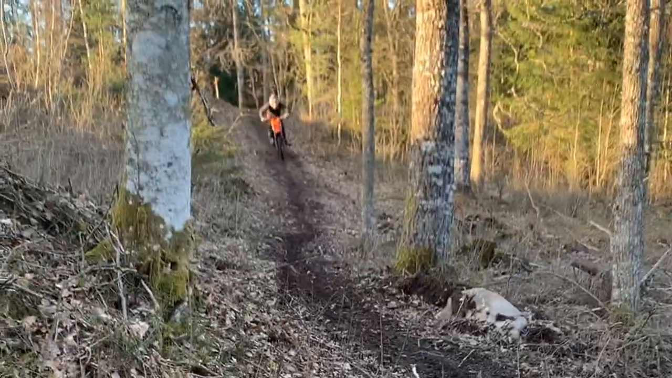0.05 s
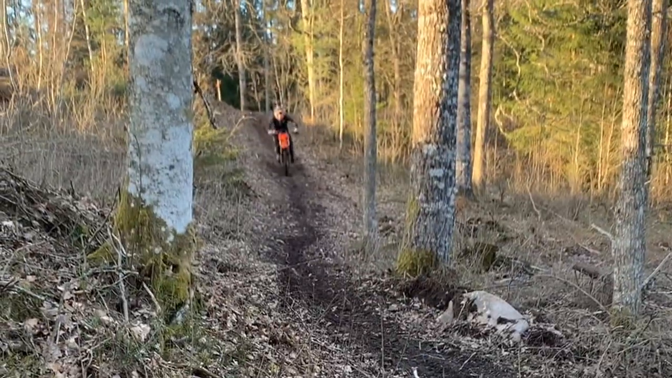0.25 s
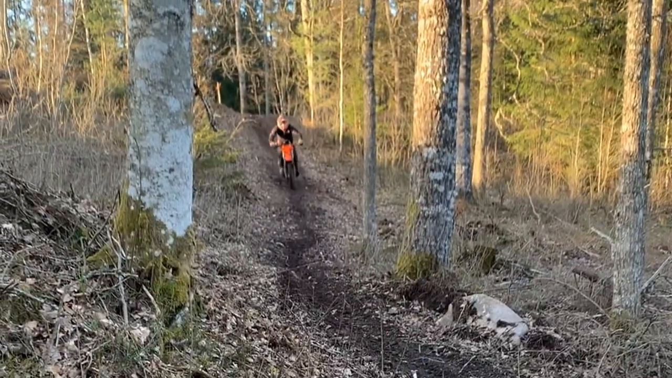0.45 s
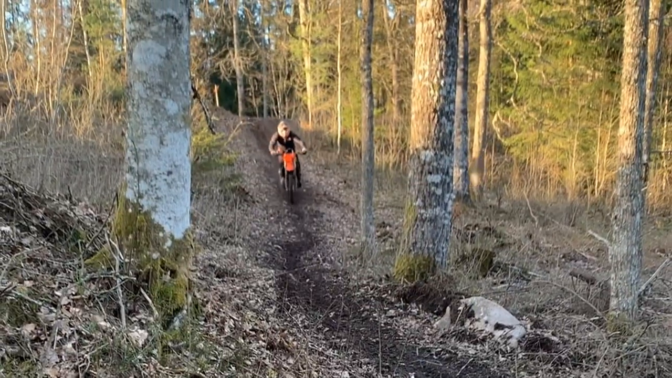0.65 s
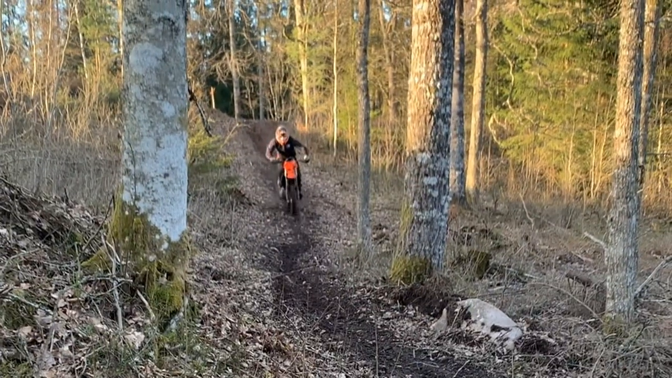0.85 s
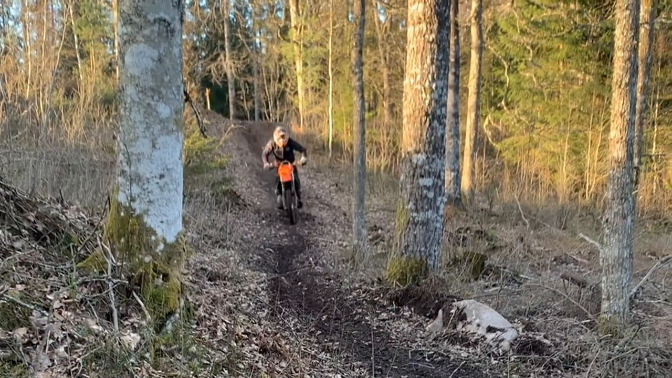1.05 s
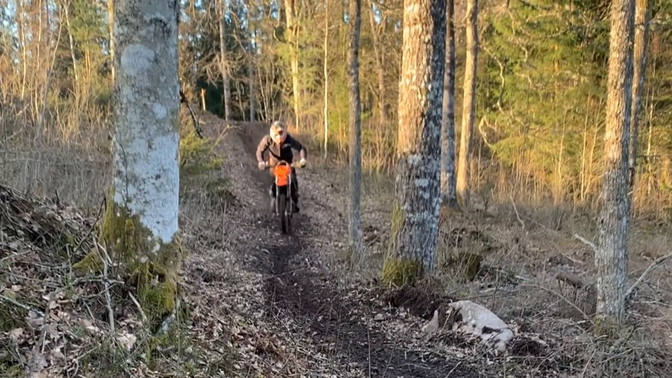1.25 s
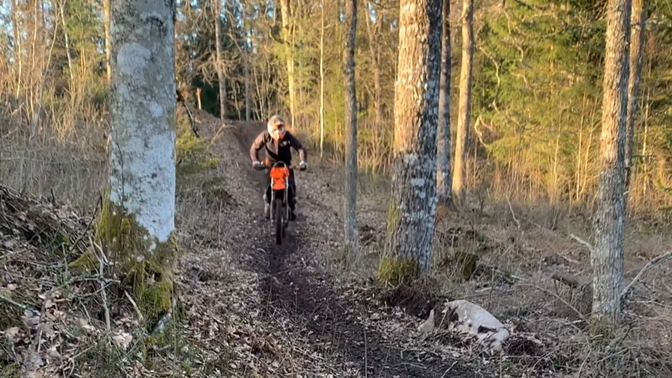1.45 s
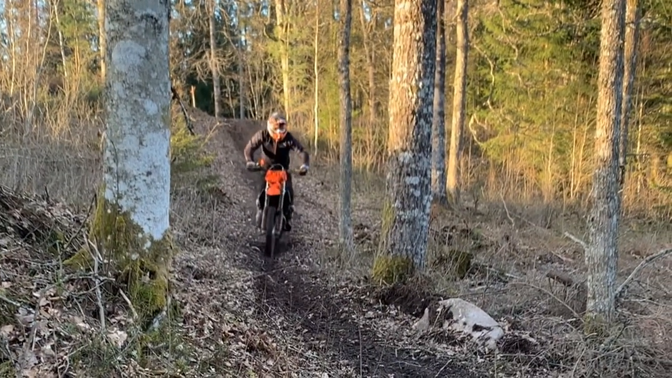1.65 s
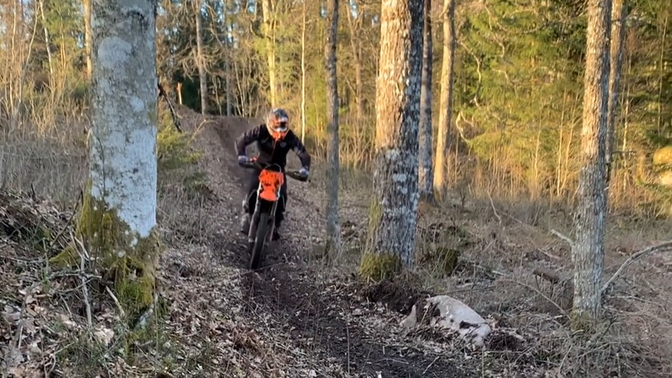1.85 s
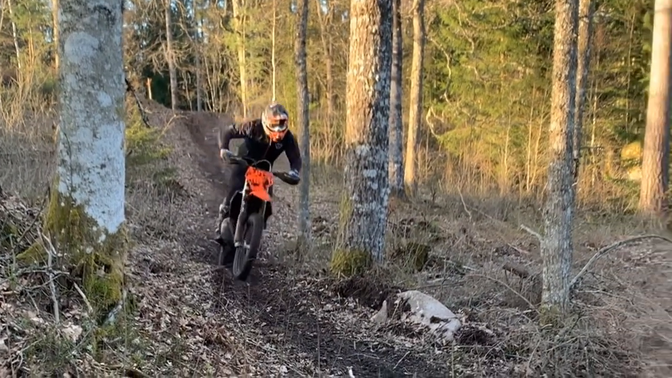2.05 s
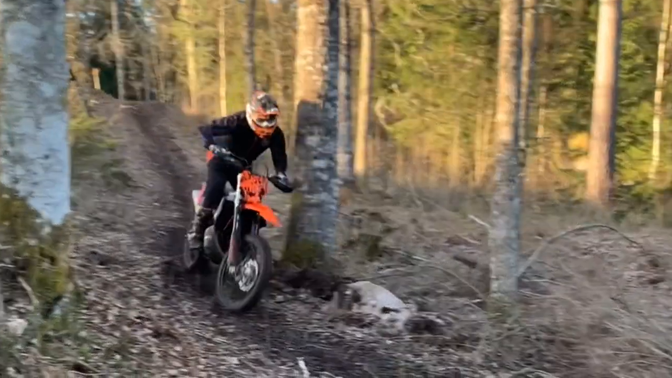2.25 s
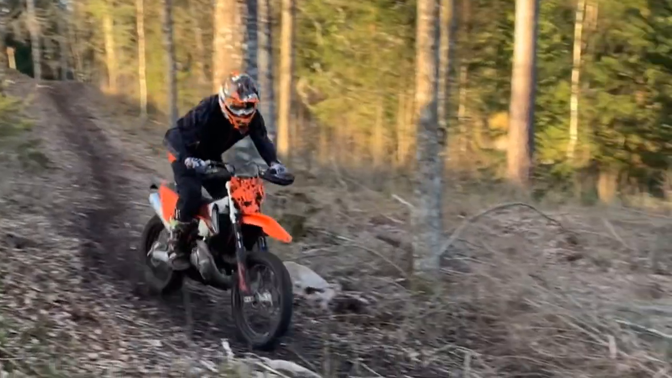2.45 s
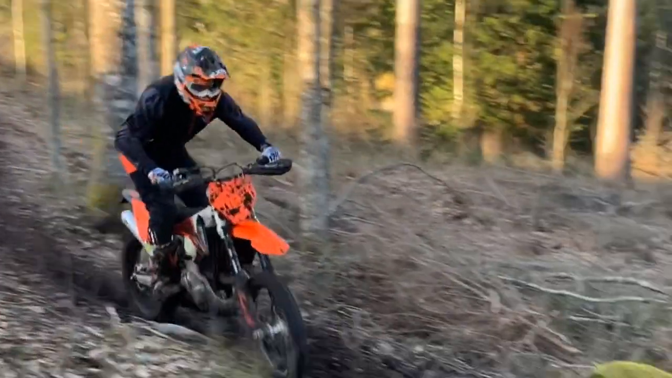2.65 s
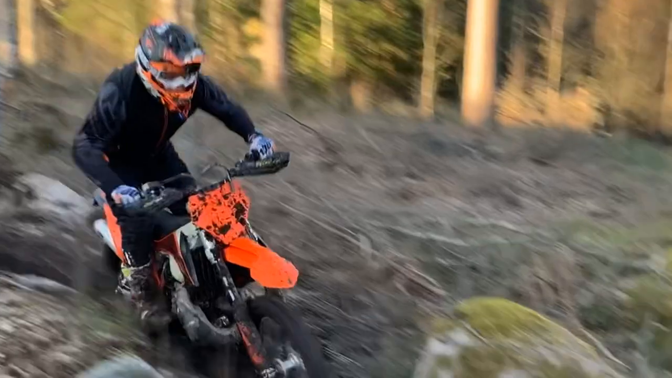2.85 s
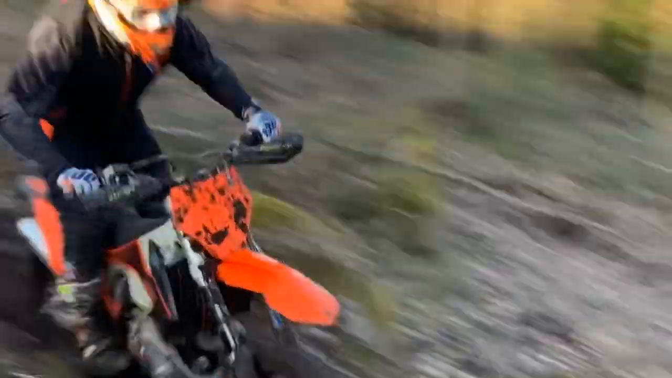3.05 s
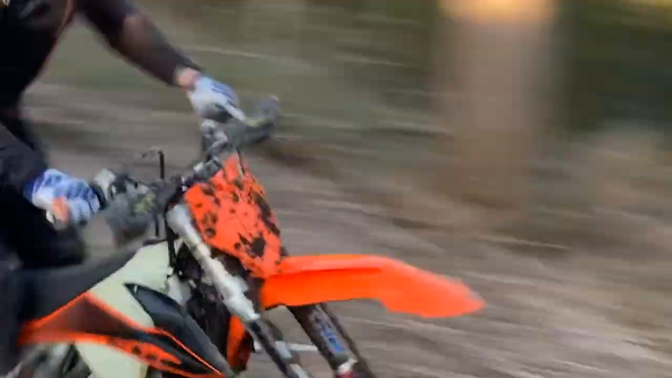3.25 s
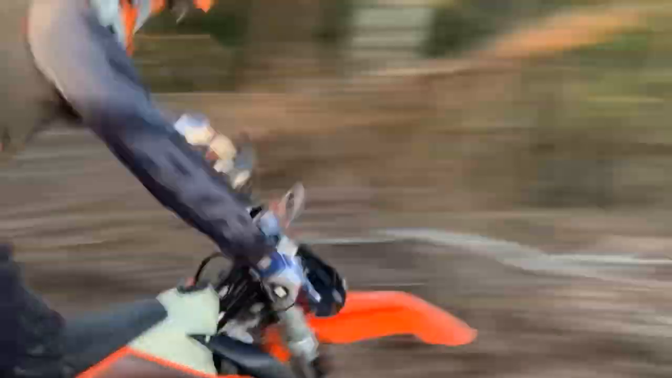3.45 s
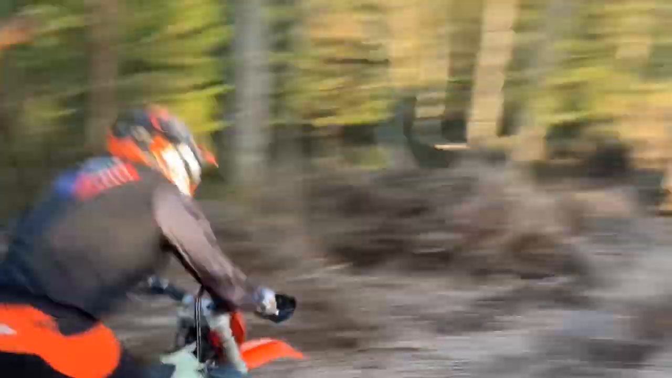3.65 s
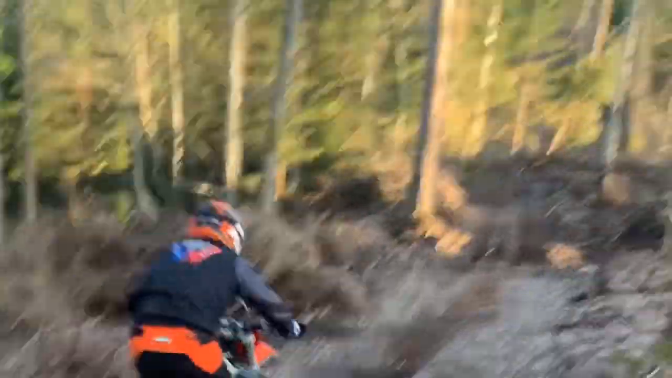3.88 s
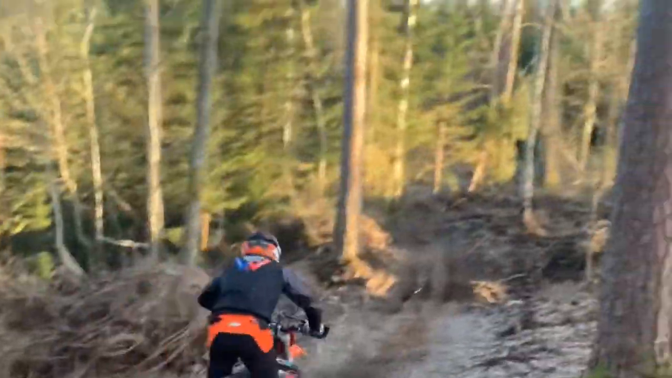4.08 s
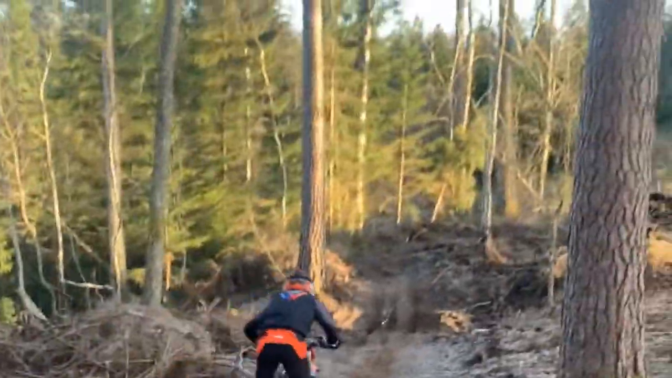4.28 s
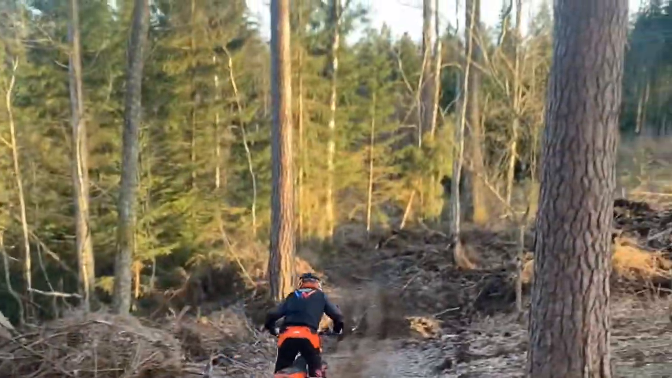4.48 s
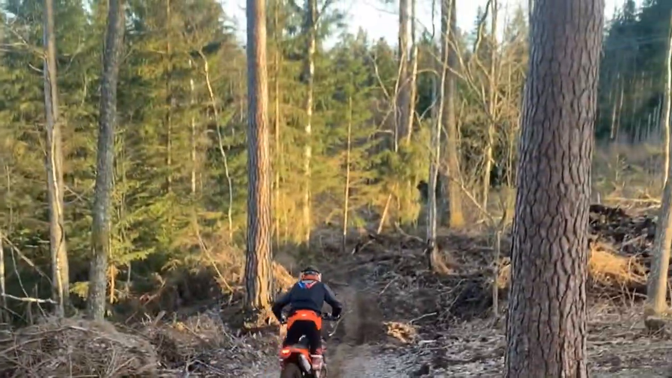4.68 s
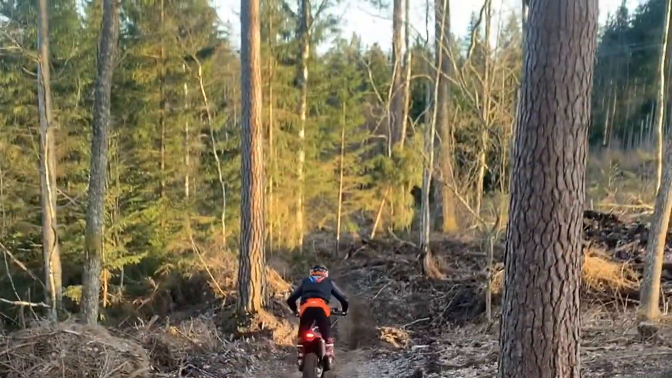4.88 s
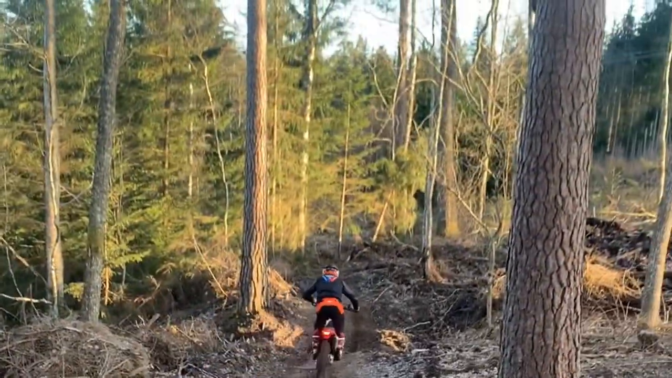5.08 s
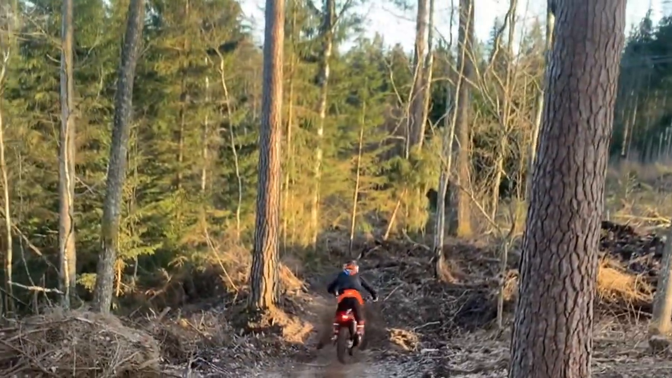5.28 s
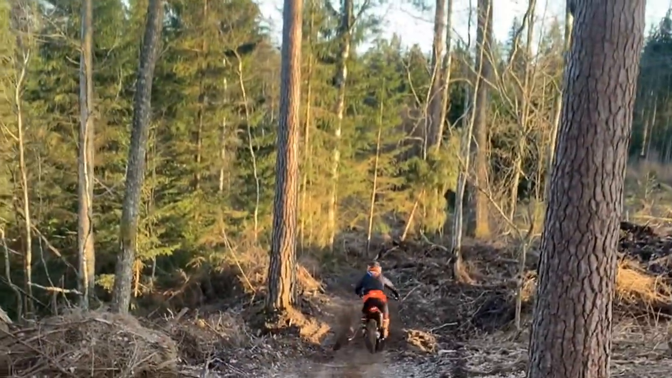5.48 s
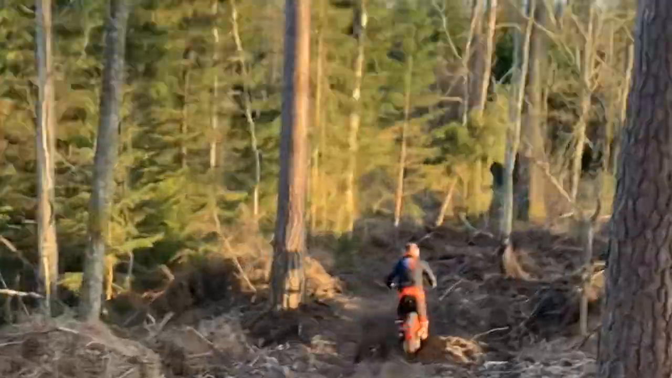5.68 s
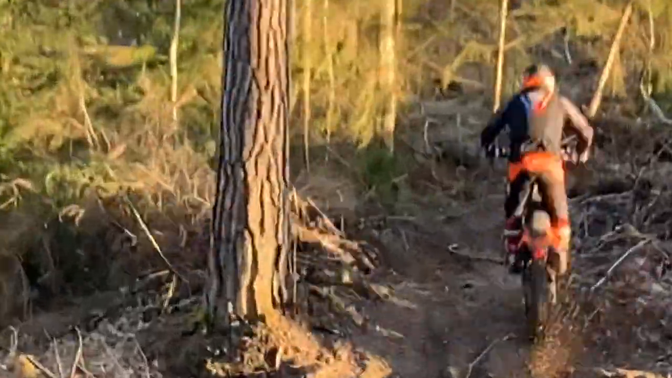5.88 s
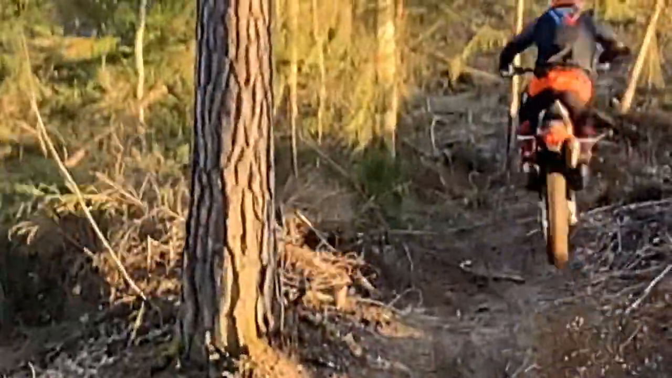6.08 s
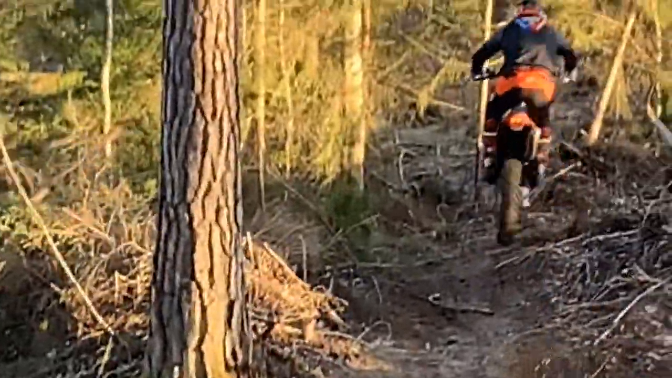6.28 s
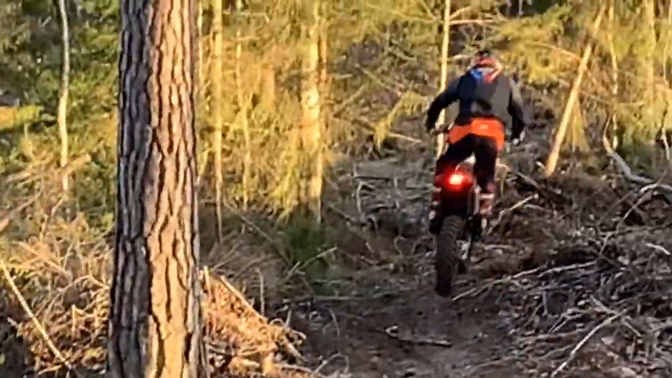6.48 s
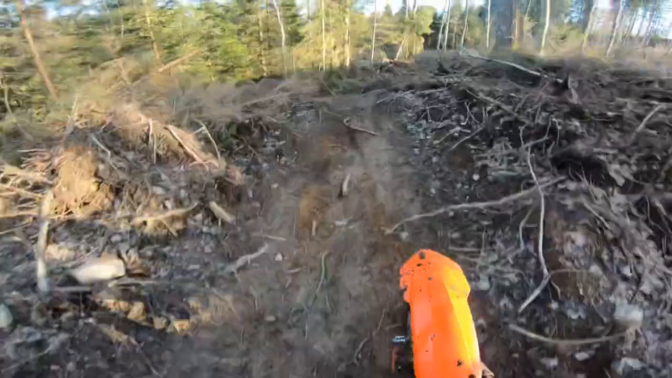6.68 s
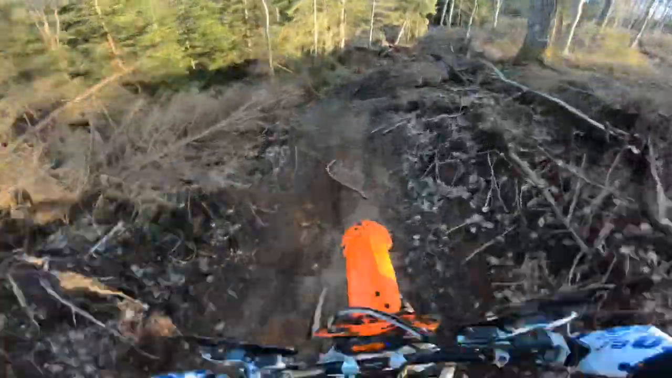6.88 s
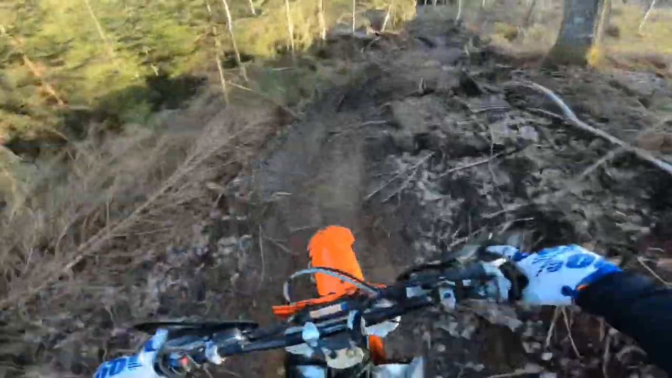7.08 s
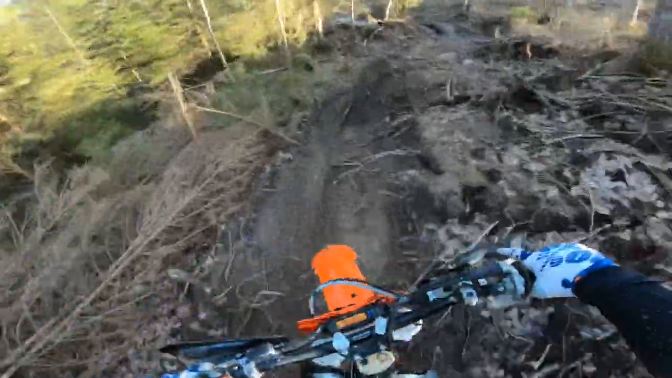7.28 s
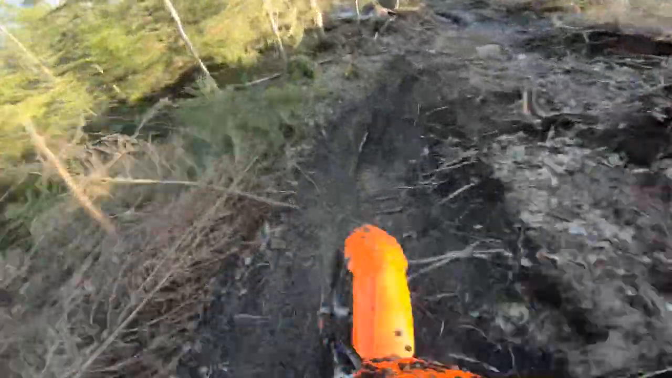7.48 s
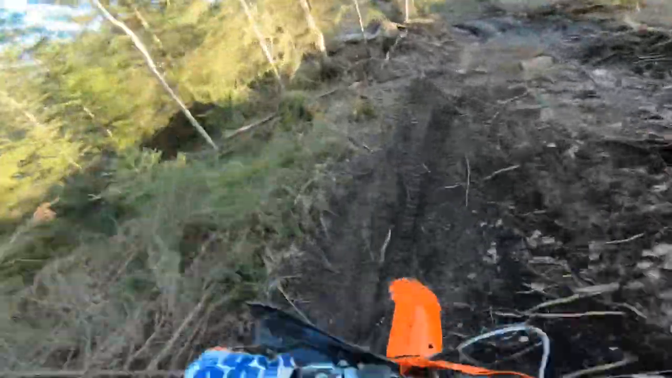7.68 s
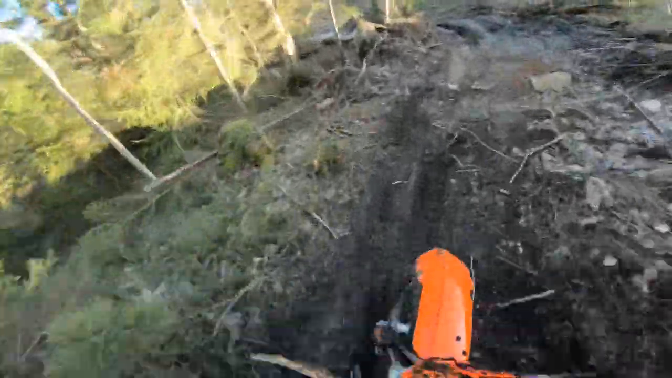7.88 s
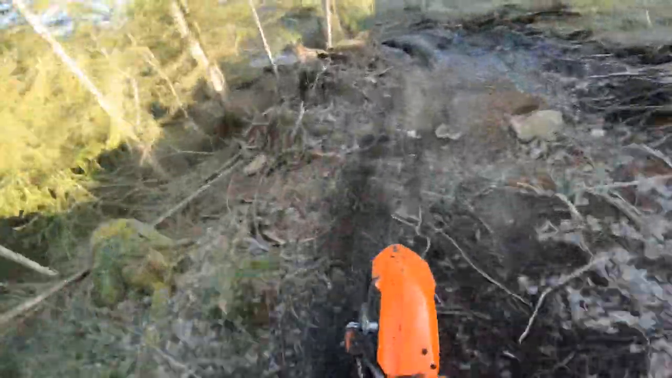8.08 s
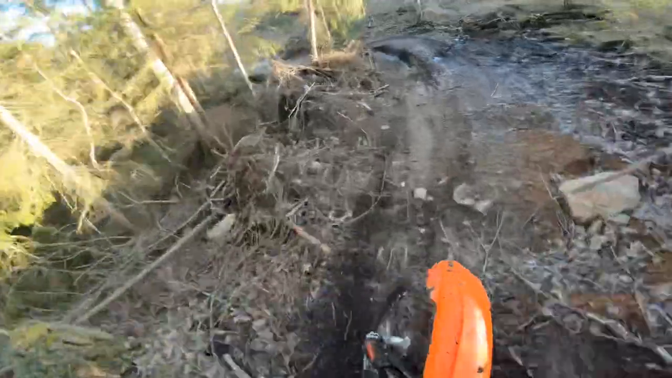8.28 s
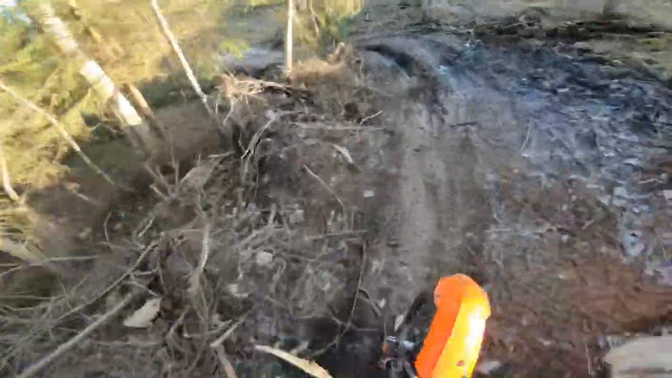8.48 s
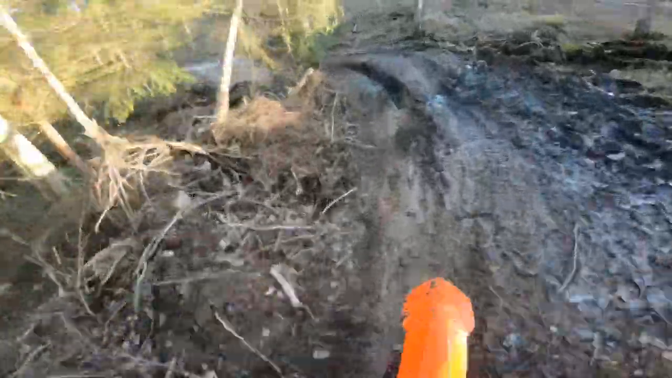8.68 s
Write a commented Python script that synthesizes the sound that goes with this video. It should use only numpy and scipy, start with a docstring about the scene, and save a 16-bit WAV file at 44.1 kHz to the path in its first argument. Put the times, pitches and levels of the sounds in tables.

```python
"""A two-stroke dirt bike nears along a forest trail in blips of throttle, passes close by and climbs away.
Each firing rings the exhaust; noise through metal resonances is the clatter, low sines are the hum.
Lone firings pop off the throttle, knocks crack, a twig snaps and the rear tyre rasps over the crest.
Then it is heard from the seat: hard firings that flare into revs, rattle, hiss, knocks, scrapes and
gusts of shaped noise, with peaks clipped at full scale."""
import sys
import numpy as np
from scipy import signal
from scipy.fft import rfft, irfft, next_fast_len
from scipy.io import wavfile
from scipy.ndimage import uniform_filter1d

SR = 44100
rng = np.random.default_rng(int(sys.argv[2]) if len(sys.argv) > 2 else 0)


def int16_out(signal):
    """Quantize to a 16-bit WAV file."""
    q = np.round(np.clip(np.atleast_2d(signal).T, -1, 1) * 32767)
    wavfile.write(sys.argv[1], SR, q.astype(np.int16))


N = 384993
TIME = np.arange(N) / SR   # s
PASS_S = 3.312   # the bike is nearest to the trailside listener

# moves of the throttle: (start [s], end [s], firing rate reached [Hz], effort before its swell [dB])
THROTTLE_MOVES = [(0, 0.44, 69, -34), (.52, .7, 47.45, -39), (.77, .87, 52.1, -10), (.87, .98, 67.1, -8),
                  (.98, 1.03, 60.13, -9), (1.03, 1.14, 68.08, -8), (1.14, 1.2, 56.76, -11.5),
                  (1.2, 1.31, 68.27, -6.5), (1.31, 1.4, 60, -12), (1.4, 1.49, 69.8, -11.5),
                  (1.49, 1.59, 66.95, -13), (1.62, 1.83, 46.47, -27), (2.3, 2.379, 47.13, -7.5),
                  (2.522, 2.565, 54.08, -2.5), (2.565, 2.61, 62, 1.5), (2.61, 2.67, 58, -3.5),
                  (2.779, 2.88, 55.2, -1.5), (2.88, 2.94, 63, -0.5), (2.94, 3.0, 58, -5),
                  (3.0, 3.06, 58, -7), (3.06, 3.13, 60.93, -0.5), (3.13, 3.18, 64.98, -0.5),
                  (3.18, 3.23, 73.97, -0.5), (3.23, 3.29, 63, 0), (3.29, 3.335, 55, -10.5),
                  (3.403, 3.43, 53.76, -12.5), (3.62, 3.672, 49.17, -12), (3.672, 3.745, 52.2, -6),
                  (3.745, 3.78, 58, -1.5), (3.8, 3.82, 60, 2), (3.82, 3.98, 58.8, -3),
                  (4.015, 4.05, 59.66, -9.5), (4.14, 4.16, 54.3, -6.5), (4.212, 4.23, 53.82, -3),
                  (4.23, 4.31, 68.46, -1.5), (4.31, 4.38, 62, -1.5), (5.465, 5.5, 50.5, -7.5),
                  (5.5, 5.585, 44.92, -4.5), (5.585, 5.64, 51.74, -1), (5.64, 5.68, 55.44, -2),
                  (5.68, 5.73, 55.26, -7), (5.73, 5.8, 47.6, -4), (5.8, 5.885, 50.82, -0.5),
                  (5.885, 5.935, 52, -7), (6.612, 6.622, 91.45, -8), (6.622, 6.655, 87.77, -3),
                  (6.671, 6.705, 70.4, -7.5), (6.705, 6.755, 57.4, -12.5), (6.755, 6.785, 85.6, -4.5),
                  (6.785, 6.84, 83.36, -6), (6.84, 6.87, 50.22, -19), (7.6, 7.68, 38.02, -8.5),
                  (7.755, 7.81, 43.7, -4.5), (7.81, 7.87, 44, -2), (8.104, 8.2, 41.86, -1.5),
                  (8.2, 8.285, 75.97, -2), (8.285, 8.335, 56.43, -4), (8.335, 8.375, 51.97, -1),
                  (8.375, 8.47, 40.77, -4), (8.47, 8.675, 43.4, -5), (8.675, 8.73, 48, -1.5)]
# colour of the low rumble and of the wind on the rider: (frequency [Hz], relative level [dB])
WIND_COLOUR = [(20, -35), (45, -4), (80, -4), (130, -6.5), (200, -13.5), (400, -14.5), (1000, -49.5),
               (3000, -100)]


# tools shared by the sources

def from_db(db):
    """Turn decibels into gain."""
    return 10 ** (np.asarray(db) / 20)


def in_time(rows):
    """Turn each column of a table into a curve over time."""
    s, *columns = np.transpose(rows)
    return [np.interp(TIME, s, column) for column in columns]


def since(s):
    """Seconds gone since a moment, zero before it."""
    return np.maximum(TIME - s, 0)


def even(x):
    """Hold the slow level at rms 1, keeping the single beats."""
    power = uniform_filter1d(uniform_filter1d(x * x, size=3000), size=2200)
    return x / np.sqrt(np.maximum(power, 0) + 1e-12)


def drift(rate):
    """Wander at random with spread near 1, through this many points a second."""
    steps = rng.standard_normal(2000)
    return np.interp(TIME * rate, np.arange(len(steps)), steps)


def cut(x, hz, kind, order=2):
    """Causal low- or high-pass."""
    return signal.sosfilt(signal.butter(order, hz, kind, fs=SR, output="sos"), x + 1e-18)


def coloured(noise, spectrum):
    """Shape noise by a spectrum drawn over log frequency; rms 1."""
    hz, db = np.transpose(spectrum)
    size = noise.shape[-1]
    padded = next_fast_len(size)
    bins = np.maximum(np.fft.rfftfreq(padded, 1 / SR), 1)
    gain = from_db(np.interp(np.log(bins), np.log(hz), db))
    out = irfft(rfft(noise, padded) * gain, padded)[..., :size]
    return out / out.std()


def resonate(x, modes):
    """Ring parallel resonances with alternating signs."""
    out = 0
    for k, (hz, width, db) in enumerate(modes):
        r = np.exp(-np.pi * width / SR)
        top = (-1) ** k * from_db(db) * (1 - r * r) / 2
        poles = [1, -2 * r * np.cos(2 * np.pi * hz / SR), r * r]
        out = out + signal.lfilter([top, 0, -top], poles, x + 1e-18)
    return out


def bent(x, modes, stretch):
    """Move the pitch of every resonance by the factor stretch, by filtering on a warped clock."""
    clock = np.cumsum(stretch)
    ticks = np.arange(int(clock[-1]))
    return np.interp(clock, ticks, resonate(np.interp(ticks, clock, x), modes))


def turning(x, sides, turn_s, stretch, fade_s):
    """The bike shows one side after another; each has its own resonances."""
    turned = [np.clip((TIME - s) / fade_s + .5, 0, 1) for s in turn_s]
    passed = [np.ones(N)] + turned + [np.zeros(N)]
    out = np.zeros(N)
    for a, b, modes in zip(passed, passed[1:], sides):
        facing = a > b
        share = np.sqrt((a - b)[facing])
        out[facing] += share * even(bent(x[facing], modes, stretch[facing]))
    return even(out)


def clicks_at(rows):
    """Place one click for each (time [s], level [dB]) row."""
    out = np.zeros(N)
    for s, db in rows:
        out[int(s * SR)] += from_db(db)
    return out


def puffs(clicks, decay_s):
    """Turn each click into a dying burst of noise with the same energy."""
    r = np.exp(-1 / (decay_s * SR))
    envelope = signal.lfilter([np.sqrt(1 - r * r)], [1, -r], clicks + 1e-18)
    return envelope * rng.standard_normal(N)


# the engine

def progress(starts, ends):
    """How far a move of the throttle has got, 0 to 1, quick at first."""
    return np.sin(np.pi / 2 * np.clip((TIME - starts) / max(ends - starts, .01), 0, 1))


def engine_speed():
    """Each move eases the engine to a new rate; with the throttle shut the flywheel runs down to idle."""
    idle_hz, coast_s = 39.27, 0.36
    speed = np.full(N, float(THROTTLE_MOVES[0][2]))
    for starts, ends, hz, _ in THROTTLE_MOVES:
        i = int(np.clip(starts * SR, 0, N - 1))
        pulled = speed[i] + (hz - speed[i]) * progress(starts, ends)
        coasting = idle_hz + (pulled - idle_hz) * np.exp(-since(ends) / coast_s)
        speed[i:] = coasting[i:]
    return speed


def engine_effort():
    """Effort builds as the engine picks up in each move, and the note swells and dies a little late."""
    swell_db, response_s = 1, 0.0043
    held = np.zeros(N)
    for starts, ends, _, db in THROTTLE_MOVES:
        during = (TIME >= starts) & (TIME < ends)
        held += during * from_db(db + swell_db * (progress(starts, ends) - 1.5))
    r = np.exp(-1 / (response_s * SR))
    return signal.lfilter([1 - r], [1, -r], held + 1e-18)


def driven(effort, levels_db):
    """Gain of a layer from two levels: a steady part, and a part scaled by effort (1 is full)."""
    shut, full = from_db(levels_db)
    return np.hypot(shut, full * effort)


def strokes(speed, uneven_db, jitter_s):
    """One click per revolution, each a little off in strength and time; a fresh blip starts with one."""
    turns = np.cumsum(speed) / SR
    for before, move in zip(THROTTLE_MOVES, THROTTLE_MOVES[1:]):
        if move[0] - before[1] > .06:   # a pause this long [s] makes the next move a fresh blip
            i = int(move[0] * SR)
            turns[i:] += np.ceil(turns[i]) - turns[i] + 1e-9
    at = np.flatnonzero(np.diff(np.floor(turns)))
    chance = rng.standard_normal((1000, 2))[:len(at)]
    moved = at + (chance[:, 0] * jitter_s * SR).astype(int)
    clicks = np.zeros(N)
    clicks[np.clip(moved, 0, N - 1)] = from_db(uneven_db * np.minimum(chance[:, 1], 1))
    return clicks


# exhaust, from the start

def chamber(x):
    """Pulses run to and fro in the expansion chamber: an all-pass draws them out without colouring."""
    trip_s, reflection = 0.0031, 0.6
    lag = int(trip_s * SR)
    trips = np.pad(x, (0, -N % lag)).reshape(-1, lag)
    return signal.lfilter([reflection, 1], [1, reflection], trips, axis=0).ravel()[:N]


def blowdown(firings, rasp_db, rasp_hz, decay_s):
    """The port opens: a pressure pulse that echoes in the pipe, then a rush of turbulent gas."""
    rush = cut(puffs(firings, decay_s), rasp_hz, "high", order=4)
    return chamber(firings) + from_db(rasp_db) * rush


def shell_rasp(firings):
    """Each firing sets the thin steel wall of the expansion chamber buzzing."""
    # resonances of the steel: (frequency [Hz], width [Hz], level [dB])
    shell_modes = [(2500, 390, -6.5), (3300, 320, 0), (4140, 370, 2)]
    return from_db(-34.5) * even(resonate(puffs(firings, decay_s=0.0093), shell_modes))


def trail_exhaust(speed, effort, near, shade_db):
    """Firings ring the pipe as each side faces the listener; its resonances rise with the firing rate."""
    # pipe resonances as heard from each side: (frequency before bending [Hz], width [Hz], level [dB])
    pipe_ahead = [(63, 15, -1), (113.6, 58, 1), (251, 82, 5.5), (329, 202, -5.5), (513, 230, -29.5),
                  (847, 150, -12), (1055, 96, -25)]
    pipe_nearing = [(112.7, 34, 4.5), (231.3, 53, 4.5), (347, 81, -3.5), (551.4, 160, -12.5),
                    (750.2, 47, -5), (1000, 96, -11)]
    pipe_beside = [(121, 27, 6), (280, 45, 10.5), (389, 100, -5.5), (615, 26, -7), (982, 44, -6.5),
                   (1084, 53, -5.5)]
    pipe_abreast = [(90, 40, 0), (190, 87, -3), (439, 41, 7.5), (720, 220, -9.5), (1210, 180, -13.5)]
    pipe_past = [(62, 48, 0), (195.5, 33, 10), (406.3, 33, 0), (533, 20, 6.5), (780, 237, -9.5),
                 (1390, 550, -27)]
    pipe_behind = [(64, 13, -2), (123, 55, -2.5), (248, 62, 9), (326, 66, 4), (483.4, 61, -2),
                   (806, 330, -10), (1500, 400, -32)]
    pipe_climbing = [(110, 20, 7.5), (58, 30, 6), (318, 31, 16), (624, 85, -3), (760, 77, -2)]
    # hard firings as the engine catches again: (time [s], level over a normal firing [dB])
    bangs = [(3.673, 2), (3.751, 9), (3.802, 0.5), (4.231, 4)]
    bend_power, reference_hz = 0.38, 60
    firings = strokes(speed, uneven_db=2.5, jitter_s=0.00007) + clicks_at(bangs)
    gas = blowdown(firings, rasp_db=-7.0, rasp_hz=530, decay_s=0.0098)
    sides = [pipe_ahead, pipe_nearing, pipe_beside, pipe_abreast, pipe_past, pipe_behind, pipe_climbing]
    rate_bend = (speed / reference_hz) ** bend_power
    pipe = turning(gas, sides, [2.2, 3.05, 3.36, 3.785, 4.12, 5.1], rate_bend, fade_s=0.068)
    note = driven(effort, (-31, -3)) * cut(pipe, 1700, "low")
    shell = effort * from_db(-shade_db) * shell_rasp(firings)
    return near * (note + shell)


# clatter, from the start

def grit(per_s, spread_db):
    """Random tiny impacts of very unequal size; rms 1."""
    sizes = from_db(spread_db * np.minimum(rng.exponential(1, N), 4))
    grains = puffs(sizes * (rng.random(N) < per_s / SR), decay_s=0.0026)
    return grains / grains.std()


def rattle(speed, slap_db, grit_db):
    """Piston slap once a revolution over the steady rush of gears and chain, with grit from the tyres."""
    slap = even(puffs(strokes(speed, uneven_db=16.0, jitter_s=0.00032), decay_s=0.016))
    tyres = grit(per_s=280, spread_db=7.5)
    return rng.standard_normal(N) + from_db(slap_db) * slap + from_db(grit_db) * tyres


def ground_bounce(x, near):
    """The ground returns a copy whose lag and strength grow as the bike nears, sweeping the colour."""
    nearest_lag_s, nearest_db = 0.00161, -13
    bounce = near * from_db(nearest_db)
    late = np.array([np.interp(TIME - nearest_lag_s * near, TIME, ear) for ear in x])
    return (x + bounce * late) / np.hypot(1, bounce)


def trail_clatter(speed, effort, near, shade_db, doppler):
    """Rattle rings cylinder, cases and chain; many parts radiate, so it is wide."""
    # metal resonances from each side: (frequency before shifting [Hz], width [Hz], level [dB])
    metal_ahead = [(745, 270, 1), (1138, 145, -0.5), (1626, 134, 2), (1825, 78, 5), (2320, 89, -2.5),
                   (3220, 140, -12), (3610, 85, -11), (4220, 126, -7.5), (4860, 170, -14.5),
                   (6180, 850, -25)]
    metal_nearing = [(720, 105, 13.5), (1001.3, 205, 10), (1600, 280, 1.5), (1857, 80, 4), (2300, 110, -1),
                     (3013, 220, -3.5), (3630, 184, 1.5), (4250, 160, -2.5), (5300, 800, -14)]
    metal_beside = [(707, 113, 9.5), (1140, 153, 9.5), (1484, 110, 8), (1803, 130, 6.5), (2380, 52, 5),
                    (3120, 410, 2.5), (3910, 250, 0), (4270, 65, 2), (5500, 1800, -11)]
    metal_behind = [(477, 375, 7.5), (798, 350, 11), (1574, 335, 7.5), (1774, 252, 7), (2270, 150, 2.5),
                    (2887, 106, 2.5), (3620, 410, -6), (4410, 510, -4), (5480, 1700, -13.5)]
    sides = [metal_ahead, metal_nearing, metal_beside, metal_behind]
    db_per_octave = 5   # a faster engine clatters louder
    shift = doppler * (1 + 0.02 * drift(5))   # the colour wanders a little
    layers = []
    for _ in range(2):
        source = cut(rattle(speed, slap_db=-5.0, grit_db=-5.0), 430, "high")
        layers.append(turning(source, sides, [2.75, 3.1, 3.65], shift, fade_s=0.22))
    centre, spread = layers
    wide = centre + from_db(1.5) * spread * np.array([[1], [-1]])   # opposite sign at each ear
    level_db = db_per_octave * np.log2(speed / speed.mean()) - shade_db
    return ground_bounce(near * driven(effort, (-26, -19)) * from_db(level_db) * wide, near)


# hum, rumble, echo and air, from the start

def hum(speed):
    """The smooth low orders of the piston pumping air, as wavering sines."""
    # orders: (multiple of engine speed, relative level before wavering [dB])
    orders = [(1, -4), (2, -0.5), (3, -22), (4, -18.5)]
    waver_db = 4
    angle = 2 * np.pi * np.cumsum(speed) / SR
    # the lowest order leaves backwards from the silencer and is weaker in front
    ahead_db = -30.5 * np.clip((PASS_S - TIME) / .5, 0, 1)
    out = np.zeros(N)
    for multiple, db in orders:
        multiple = round(multiple)
        level_db = db + (multiple == 1) * ahead_db + waver_db * drift(14)
        out += from_db(level_db) * np.sin(multiple * angle)
    return even(out)


def trail_hum(speed, effort, near):
    """The low hum carries better: it falls with a lower power of distance."""
    return near ** 0.57 * driven(effort, (-32, -11.5)) * hum(speed)


def trail_rumble(effort, near):
    """Low noise that grows with effort and nearness."""
    rumble = cut(coloured(rng.standard_normal(N), WIND_COLOUR), 63, "high")
    return near * driven(effort, (-25, -17)) * rumble


def forest(x, t60, echo_db):
    """Ground and trunks scatter a short tail, different at each ear."""
    # colour of the tail: (frequency [Hz], relative level [dB])
    tail_colour = [(40, 2), (200, -7.5), (500, -2), (2000, -12.5), (5000, -10.5), (9000, -24)]
    t = np.arange(SR // 2) / SR
    tail = coloured(rng.standard_normal((2, len(t))), tail_colour) * from_db(-60 * t / t60)
    tail /= np.sqrt(np.sum(tail ** 2, axis=1, keepdims=True))
    return from_db(echo_db) * signal.oaconvolve(x[None], tail, axes=1)[:, :N]


def faint_air():
    """Faint steady hiss, different at each ear."""
    # colour: (frequency [Hz], relative level [dB])
    air_colour = [(4000, -10.5), (8500, -4.5), (10500, -3), (12500, -24)]
    return from_db(-74.5) * coloured(rng.standard_normal((2, N)), air_colour)


# single events, in order of their first one

def pops(ring_s, gain_db):
    """A lone firing off the throttle booms dully through the silencer: two dying sines."""
    # pops: (time [s], level before gain_db [dB], boom frequency [Hz])
    pop_rows = [(0.433, -33, 86.5), (0.742, -32.5, 105), (1.748, -33.5, 87.4), (1.918, -32, 84.6),
                (3.402, -26, 105), (3.579, -19, 165), (4.027, -18, 71.5), (4.14, -26, 88),
                (4.528, -24.5, 87), (4.715, -32, 86), (5.966, -32, 99.3), (6.11, -36, 87.1),
                (6.27, -39, 88.2), (7.598, -17.5, 88.4), (7.66, -5.5, 87), (8.009, -11, 80)]
    out, t = np.zeros(N + SR), np.arange(SR // 5) / SR
    knock = 0.41 * np.sin(2 * np.pi * 215 * t) * np.exp(-t / 0.0039)
    for s, db, hz in pop_rows:
        boom = np.sin(2 * np.pi * hz * t) * np.exp(-t / ring_s)
        i = int(s * SR)
        out[i:i + len(t)] += from_db(db + gain_db) * (boom + knock)
    return out[:N]


def knocks(gain_db):
    """Chain slaps, stones, twigs and chassis knocks: short hard cracks of dying noise."""
    # knocks: (time [s], level before gain_db [dB], decay by 60 dB [s])
    knock_rows = [(1.127, -34.5, 0.086), (1.903, -26, 0.032), (2.351, -16.5, 0.037), (2.589, -15, 0.05),
                  (3.4012, -26, 0.081), (3.466, -25.5, 0.056), (6.948, -39, 0.035), (7.075, -29, .03),
                  (7.296, -24.5, 0.057), (7.353, -20, 0.086), (7.3774, -21.5, 0.11), (7.5148, -23, 0.062),
                  (7.619, -22.5, 0.068), (7.835, -29, 0.017)]
    # colour: (frequency [Hz], relative level [dB])
    knock_colour = [(200, -27.5), (900, -3), (1900, 10), (3000, -6), (4300, 4.5), (6300, -6.5),
                    (9000, -25.5), (16000, -48.5)]
    out, t = np.zeros(N + SR), np.arange(SR // 4) / SR
    for s, db, t60 in knock_rows:
        crack = coloured(rng.standard_normal(len(t)), knock_colour) * from_db(-60 * t / t60)
        i = int(s * SR)
        out[i:i + len(t)] += from_db(db + gain_db) * crack
    return out[:N]


def twig():
    """A dry twig snaps under the tyre: one click rings two broad resonances."""
    # resonances: (frequency [Hz], width [Hz], level [dB])
    twig_modes = [(2000, 1260, 6.5), (4200, 2160, 3)]
    snap = clicks_at([(5.6097, -5.5)])   # (time [s], level [dB])
    return cut(resonate(snap, twig_modes), 1000, "high")


def wheelspin():
    """The rear tyre rasps over the crest: a short swell of flying grit, different at each ear."""
    # colour: (frequency [Hz], relative level [dB])
    spin_colour = [(800, -46), (1500, 0), (1800, -1), (2500, -6), (3500, -19), (7000, -39)]
    peak_s, half_s = 6.077, 0.19
    grains = np.array([grit(per_s=4700, spread_db=8.0) for _ in range(2)])
    swell = np.exp(-((TIME - peak_s) / half_s) ** 2)
    return from_db(-39) * swell * coloured(grains, spin_colour)


def trailside(speed, effort, blows):
    """The bike nears, passes and climbs away; level follows one over distance, with Doppler on the metal."""
    # place of the bike: (time [s], left minus right level [dB], lead of the left ear [ms])
    place = [(0, -0.5, 0.27), (2.7, 0.5, 0.19), (3.7, 0, -0.064), (4.3, 1, 0.25), (5.2, 0, -0.43),
             (6.6, 0.5, -0.74)]
    pass_distance_m, bike_m_per_s, sound_m_per_s = 2.187, 6.8, 343
    treble_end_hz = 6800
    distance_m = np.hypot(pass_distance_m, bike_m_per_s * (TIME - PASS_S))
    near = pass_distance_m / distance_m
    doppler = 1 - np.gradient(distance_m, TIME) / sound_m_per_s
    # bike and rider hide the engine more and more as they leave: 2.5 dB at 2.3 s after the pass
    shade_db = 2.5 * np.sqrt(since(PASS_S) / 2.3)
    balance_db, lead_ms = in_time(place)

    exhaust = trail_exhaust(speed, effort, near, shade_db)
    clatter = trail_clatter(speed, effort, near, shade_db, doppler)
    bike = exhaust + trail_hum(speed, effort, near) + blows
    ears = np.array([np.interp(TIME + side * lead_ms / 2000, TIME, bike) for side in (1, -1)])
    direct = (ears + clatter) * from_db(np.outer([.5, -.5], balance_db))
    # the echo's share grows slowly with distance
    echo = forest(bike / near ** 0.12, t60=0.3, echo_db=-13)
    heard = direct + echo + trail_rumble(effort, near) + wheelspin()
    snap = cut(twig(), treble_end_hz, "low")
    return cut(heard, treble_end_hz, "low", order=14) + snap + faint_air()


# from the rider's seat

def seat_exhaust(speed, effort):
    """Hard firings ring the pipe; its resonances glide together along a drawn pitch curve, dipping early."""
    # pipe resonances: (frequency before bending [Hz], width [Hz], level [dB])
    pipe_seat = [(165, 106, -7), (277.5, 24.4, 10), (340, 82, -8), (491.3, 70, -14.5), (912, 160, -20),
                 (1115, 250, -26)]
    # pitch curve of the main resonance: (time [s], frequency [Hz])
    main_note = [(6.62, 310), (6.69, 293.5), (6.77, 273.5), (6.8, 185.7), (6.86, 187), (7.75, 274.1),
                 (7.86, 289), (8.11, 278), (8.2, 292), (8.29, 311), (8.35, 280), (8.56, 258), (8.7, 308.7)]
    note_hz, = in_time(main_note)
    gas = blowdown(strokes(speed, uneven_db=2.0, jitter_s=0.00015), rasp_db=3.0, rasp_hz=408, decay_s=0.021)
    pipe = even(bent(gas, pipe_seat, note_hz / pipe_seat[1][0]))   # the second row is the main resonance
    return driven(effort, (-37, -4.5)) * cut(pipe, 1500, "low", order=4)


def seat_clatter(speed, effort):
    """Rattle rings the metal of the engine below the rider."""
    # metal resonances: (frequency [Hz], width [Hz], level [dB])
    metal_seat = [(440, 306, 3), (784, 140, 11), (967, 179, 9.5), (1185, 118, 12.5), (1600, 210, -1.5),
                  (1917, 125, 0.5), (2450, 690, -10.5)]
    ringing = even(resonate(rattle(speed, slap_db=-8.5, grit_db=-4.0), metal_seat))
    return driven(effort, (-26, -19.5)) * ringing


def seat_hiss(speed, effort):
    """Chain and tyres hiss: slap-heavy rattle shaped to the treble."""
    # colour: (frequency [Hz], relative level [dB])
    hiss_colour = [(1650, -44), (2800, 3.5), (2980, -21.5), (3270, -15.5), (3500, 2), (3730, -1.5),
                   (3910, 8.5), (5280, -3.5), (5880, 1), (6550, -6), (7260, -30), (9440, -47.5),
                   (13000, -40), (16000, -40)]
    shaped = even(coloured(rattle(speed, slap_db=2.0, grit_db=-12.5), hiss_colour))
    return driven(effort, (-40, -34)) * shaped


def wind_gusts():
    """Wind on the rider: low noise whose level follows the gusts."""
    # gusts: (time [s], level [dB])
    gust_rows = [(6.63, -3.5), (6.66, -14), (7.51, -24), (7.65, -14), (7.91, -19.5), (8.0, -16),
                 (8.12, -17.5), (8.23, -6), (8.49, -18), (8.7, -27)]
    wind_db, = in_time(gust_rows)
    return from_db(wind_db) * even(coloured(rng.standard_normal(N), WIND_COLOUR))


def scraping():
    """Tyres scrape over brush and stones: the gain by which clatter and hiss swell."""
    # scrapes: (time [s], half length [s], rise [dB])
    scrape_rows = [(7.375, 0.053, 10), (7.862, 0.17, 4.5)]
    return from_db(sum(db * np.exp(-((TIME - s) / half) ** 2) for s, half, db in scrape_rows))


def seat(speed, effort, blows):
    """On the bike: firings, rattle, hiss, gusts, pops and knocks in one channel, dull on top."""
    machine = scraping() * (seat_clatter(speed, effort) + seat_hiss(speed, effort))
    return cut(seat_exhaust(speed, effort) + machine + wind_gusts() + blows, 8900, "low", order=4)


def scene():
    """First from beside the trail, then from the seat, with one engine driving both."""
    seat_s, fade_s = 6.612, 0.0065
    speed, effort = engine_speed(), engine_effort()
    blows = cut(pops(ring_s=0.0063, gain_db=14.5), 39, "high") + knocks(gain_db=-0.5)
    on_bike = np.clip((TIME - seat_s) / fade_s, 0, 1)
    return (1 - on_bike) * trailside(speed, effort, blows) + on_bike * seat(speed, effort, blows)


def record(dry):
    """Peaks past full scale overload into hard clipping; then the top is cut steeply."""
    return cut(np.clip(dry, -1, 1), 15800, "low", order=16)


dry = scene()
out = record(dry)
int16_out(out)
```